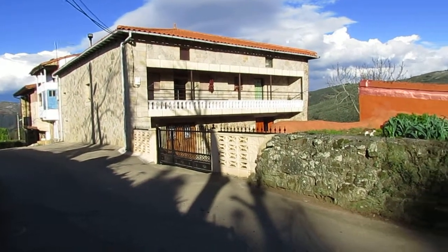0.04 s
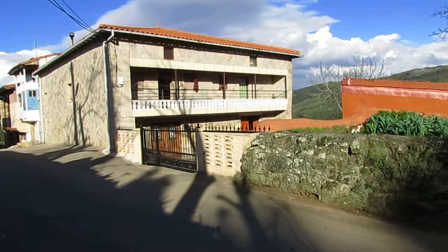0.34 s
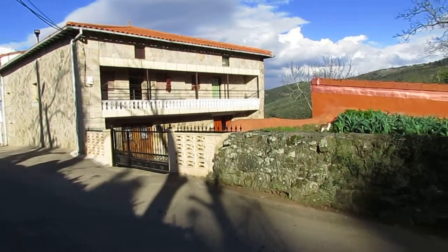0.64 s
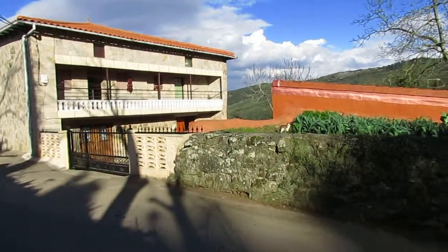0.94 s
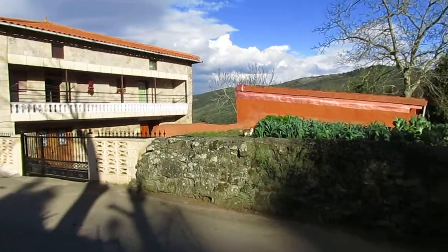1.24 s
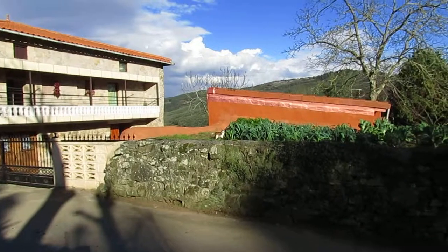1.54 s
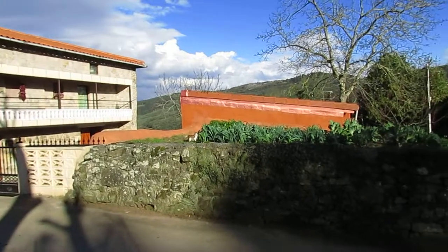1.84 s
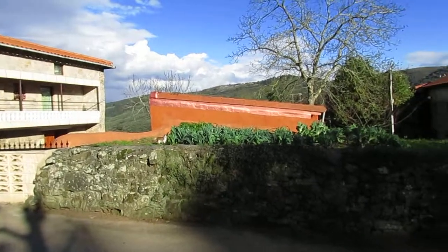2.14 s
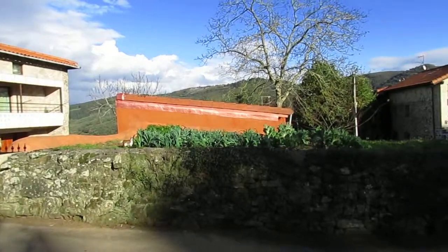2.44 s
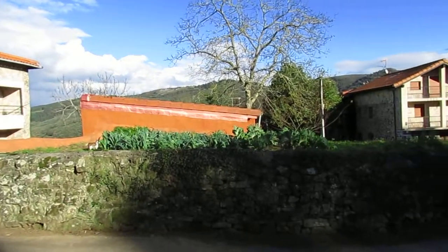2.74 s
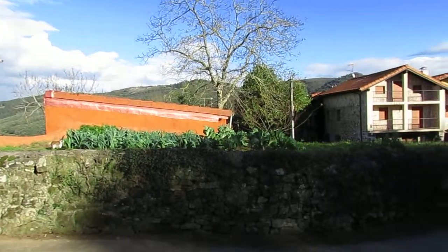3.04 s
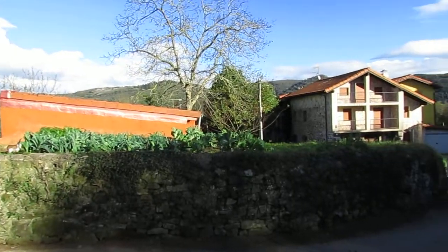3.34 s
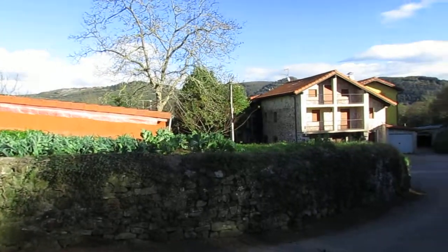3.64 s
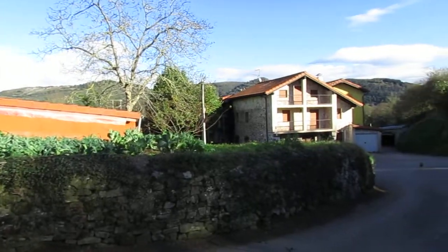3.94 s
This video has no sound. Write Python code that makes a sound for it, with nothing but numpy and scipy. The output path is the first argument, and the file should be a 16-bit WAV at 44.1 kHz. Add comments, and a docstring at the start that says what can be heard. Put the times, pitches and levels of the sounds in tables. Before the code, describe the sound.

Sharp hollow knocks repeat steadily and grow louder in a village street, with wind rumble.

```python
"""A village street with stone walls, where hard, hollow knocks come about twice a second and grow louder.
Each knock is a quick run of contacts that ring a hollow body, inside a short puff of hiss.
The houses throw the sound back. Gusts buffet the microphone, a small bird ticks four times,
and a wash of faraway outdoor noise slowly rises."""
import sys
import numpy as np
from scipy import signal
from scipy.fft import rfft, irfft
from scipy.io import wavfile

SR = 44100
rng = np.random.default_rng(int(sys.argv[2]) if len(sys.argv) > 2 else 0)


def unload_audio(sound):
    """Save the sound as a 16-bit wav file, at the path given as the first command line argument."""
    columns = np.transpose(np.atleast_2d(sound))
    # keep every value between -1 and 1, then stretch to whole-number steps
    steps = np.round(np.clip(columns, -1, 1) * 32767)
    wavfile.write(sys.argv[1], SR, steps.astype(np.int16))


N = 176400

# the knocks: t/s, body level/dB, hiss level/dB, stretch factor for the contact delays
KNOCKS = [(0.183, -36.5, -62, 1.0), (0.649, -33, -61.5, 1.0), (1.120, -38.5, -62.5, 1.16),
          (1.59, -33, -56, 1.17), (2.061, -30, -55, 1.01), (2.525, -27, -54, 1.005),
          (2.990, -27, -50.5, 1.0), (3.461, -23, -48.5, 1.1), (3.928, -24.5, -48.5, 1)]
# the contacts within one knock: delay/s, level/dB, favoured f/Hz, reach around it/octaves
CONTACTS = [(0.0, 1, 1620, 0.61), (.0032, -1.5, 1750, .35), (.0058, -7, 1540, 1.3), (.009, 2.5, 1350, 0.66),
            (0.0122, -1, 920, .3), (0.0186, -3.5, 1220, .6)]


def amp(db):
    """Turns decibels into a gain to multiply by."""
    return 10 ** (np.asarray(db) / 20)


def unit(x):
    """Scales a signal to an average strength (rms) of 1."""
    return x / np.sqrt(np.mean(x ** 2) + 1e-20)


def read(points, hz):
    """Looks up values between a table's rows, on a log-frequency scale."""
    f, value = np.transpose(points)
    return np.interp(np.log(hz + 1), np.log(f + 1), value)


def curve(table, column):
    """Turns one dB column of a time table into a gain for every sample."""
    rows = np.array(table)
    return amp(np.interp(np.arange(N) / SR, rows[:, 0], rows[:, column]))


def add(mix, start, sound):
    """Mixes a sound in at a start time in seconds."""
    part = mix[max(round(start * SR), 0):][:len(sound)]
    part += sound[:len(part)]


def noise(colour, peaks=()):
    """Steady noise with a colour (its level at each frequency) and optional resonances."""
    hz = np.fft.rfftfreq(N, 1 / SR)
    peaks_db = sum(lift * np.exp(-((hz - centre) / width) ** 2) for centre, width, lift in peaks)
    return unit(irfft(rfft(rng.standard_normal(N)) * amp(read(colour, hz) + peaks_db), N))


def wobble(hz):
    """Smooth random motion, up to about the given rate."""
    keep_slow = np.exp(-(np.fft.rfftfreq(N, 1 / SR) / hz) ** 2)
    return unit(irfft(rfft(rng.standard_normal(N)) * keep_slow, N))


def street_reverb(x):
    """Sound lingers between the houses; its tail slowly changes as the microphone turns."""
    # how long the street rings: f/Hz, time to fade by 60 dB/s
    fade_times = [(300, 0.68), (1000, 0.71), (2500, 0.89), (6000, 0.59), (13000, 0.12)]
    out, progress = np.zeros((2, N)), np.arange(N) / N
    for centre in np.linspace(0, 1, num=5):  # five tails, each blending into the next
        hz, t, spectrum = signal.stft(rng.standard_normal((2, SR)), SR, nperseg=256)
        fade = amp(-60 * t / read(fade_times, hz)[:, None])
        tail = signal.istft(spectrum * fade * (1 - np.exp(-t / 0.0046)), SR)[1]
        share = np.cos(np.pi / 2 * np.minimum(abs(progress - centre) * 4, 1))
        out += signal.fftconvolve((x * share)[None], tail / np.linalg.norm(tail[0]), axes=1)[:, :N]
    return out * amp([[0], [-3.5]])  # softer on the right


def in_street(x, right_db, reverb_db):
    """A sound reaches the left ear first, followed by wall echoes and the street's reverb."""
    # echoes off the walls: delay/s, left level/dB, right level/dB
    wall_echoes = [(0.019, -17.5, -27), (.036, -12.5, -21), (.049, -16.5, -26), (.08, -23.5, -24.5),
                   (.105, -27, -28)]
    right_lag_s = .000032
    out = np.array([x, amp(right_db) * x])
    for delay, *sides_db in wall_echoes:
        for side, db in zip(out, sides_db):
            add(side, delay, amp(db) * x)
    out[1] = irfft(rfft(out[1]) * np.exp(-2j * np.pi * np.fft.rfftfreq(N, 1 / SR) * right_lag_s), N)
    return out + amp(reverb_db) * street_reverb(x)


def outdoor_air():
    """A faraway wash with a few faint resonances, plus fine hiss, different at each ear."""
    # background loudness: t/s, wash level/dB, hiss level/dB
    levels = [(0, -58, -72), (.5, -68, -67.5), (1.2, -53.5, -69), (1.9, -55.5, -68), (2.5, -51, -63.5),
              (3.0, -50, -62), (3.35, -46, -61), (4, -43, -57)]
    # colours of the wash and the hiss: f/Hz, level/dB
    wash_colour = [(40, 18.5), (150, -1), (300, 8), (440, 1.5), (1050, 2.5), (1900, -10), (3000, -15.5),
                   (4500, -26), (9000, -41)]
    hiss_colour = [(500, -18.5), (2000, 6), (3200, 1), (5000, 1), (7200, -4.5), (9500, -8), (12500, -11.5),
                   (14500, -20)]
    # resonances in the wash: f/Hz, width/Hz, lift/dB
    wash_peaks = [(552, 66, 6.5), (874, 28, 4.5), (1550, 52, 3.5), (2730, 89, 6.5), (3160, 50, 11)]
    ears = []
    for _ in range(2):
        wash = curve(levels, column=1) * noise(wash_colour, wash_peaks) * amp(1.65 * wobble(hz=26))
        ears.append(wash + curve(levels, column=2) * noise(hiss_colour))
    return np.array(ears)


def bird_ticks():
    """A small bird's thin, slightly rough whistles sweep upward so fast that they sound like ticks."""
    # the ticks: t/s, level/dB
    ticks = [(1.01, -59.5), (1.209, -60), (1.26, -61), (1.407, -58.5)]
    length_s, low_hz, top_hz = 0.017, 4880, 7400
    out, progress = np.zeros(N), np.arange(0, length_s, 1 / SR) / length_s
    sweep_hz = low_hz + (top_hz - low_hz) * np.sin(1.9 * progress ** 0.78)
    for start, db in ticks:
        rough_hz = sweep_hz * (1 + .06 * wobble(hz=1180)[:len(progress)])
        whistle = np.sin(2 * np.pi * np.cumsum(rough_hz) / SR)
        add(out, start, amp(db) * np.sin(np.pi * progress) * whistle)
    return in_street(out, right_db=1.0, reverb_db=-4)


def wind_on_microphone():
    """Gusts rumble, flutter and pop, pushing the two channels opposite ways; hard gusts also rasp."""
    # wind strength: t/s, rumble level/dB, flutter level/dB
    gusts = [(0.0, -17, -20), (.08, -19, -16.5), (.115, -24, -14), (.21, -22.5, -18.5), (.235, -23.5, -30),
             (.27, -21.5, -22), (.42, -20, -24.5), (.53, -16, -22.5), (.58, -15.5, -20), (.615, -22, -39),
             (.65, -17.5, -21), (.72, -23.5, -38), (.82, -39, -61), (.88, -21.5, -62), (.97, -29, -25.5),
             (1.0, -23.5, -37.5), (1.06, -23, -24), (1.17, -21.5, -30.5), (1.25, -22.5, -33.5),
             (1.3, -21, -23.5), (1.38, -24.5, -37), (1.62, -19.5, -37), (1.68, -51.5, -63),
             (1.88, -43, -72), (2.02, -50, -69), (2.09, -33.5, -51.5), (2.18, -42, -71), (2.235, -20, -27),
             (2.31, -28.5, -47), (2.37, -27, -40.5), (2.44, -47, -66), (2.51, -16.5, -39),
             (2.57, -29.5, -39), (2.62, -19, -31.5), (2.68, -21, -39), (2.72, -23.5, -52),
             (3.0, -43.5, -56), (3.22, -26, -64), (3.3, -39, -65), (3.54, -36, -64), (3.59, -21, -52),
             (3.71, -21.5, -55), (3.8, -33, -67)]
    # colours of the deep rumble, the flutter above it and the rasp: f/Hz, level/dB
    rumble_colour = [(10, -35), (25, 0), (50, 3), (110, 3.5), (165, -4), (240, -16.5), (1200, -86)]
    flutter_colour = [(60, -21.5), (150, -1), (230, -0.5), (330, -6), (480, -14), (700, -31), (1300, -67)]
    rasp_colour = [(100, -20), (300, -2), (730, -1), (880, -13.5), (1150, -18.5), (2100, -38), (3500, -72)]
    # small swirls of air that pop: t/s, strength (+ pushes, - sucks), width/s
    pops = [(0.088, -0.33, 0.00068), (0.097, 0.64, 0.00094), (.103, -0.82, 0.00045), (0.267, 0.69, .0012),
            (.277, -0.67, 0.001), (.484, -0.53, 0.00099), (.511, 0.73, 0.00092), (.532, 0.65, 0.0012),
            (.564, 0.94, 0.00072), (.961, -0.38, 0.0016), (.982, 0.69, 0.0017), (1.052, -0.55, 0.0014),
            (1.071, 0.72, 0.00077), (1.142, 0.55, 0.0012), (1.173, 0.58, 0.0014), (1.302, 0.4, .001),
            (1.316, -0.53, 0.0018), (1.469, 0.33, 0.0015), (2.627, -0.44, .0018), (2.853, -0.39, 0.0051),
            (3.59, -0.9, 0.0031), (3.72, 0.5, 0.0028)]
    # the side the wind favours as the microphone turns: t/s, left minus right/dB
    balance = [(0.15, 2), (.6, -1.68), (2.3, -2.1), (2.6, 3.5), (4, 1.5)]
    flap_hz = 21 * (1 + .4 * wobble(hz=12))
    flaps = unit(amp(3 * np.sin(2 * np.pi * np.cumsum(flap_hz) / SR)))
    rumble_gain = curve(gusts, column=1) * amp(-1) * flaps
    gust_gain = curve(gusts, column=2) * flaps * unit(amp(2.3 * wobble(hz=64)))
    # two separate noises: push moves the channels opposite ways, common moves them together
    push, common = (rumble_gain * noise(rumble_colour)
                    + amp(2) * gust_gain * noise(flutter_colour)
                    + amp(-1.5) * gust_gain ** 1.604 * noise(rasp_colour) for _ in range(2))
    for when, strength, width in pops:
        offset = (np.arange(N) / SR - when) / width
        wake = np.exp(-(offset / 4) ** 2)
        pulse = 1.25 / (1 + offset ** 2) ** 2 - .28 * wake
        push = push * (1 - .7 * wake) + strength * pulse  # the noise dips around each pop
    common = common * amp(-11) / 2
    lean = np.sqrt(curve(balance, column=1)) * np.exp(0.1 * wobble(hz=6.7))
    stereo = np.array([common + push * lean, common - np.roll(push, shift=4) / lean])
    rounded = stereo / (1 + stereo ** 4) ** (1 / 4)  # squashes the biggest peaks
    return signal.sosfiltfilt(signal.butter(4, 1900, fs=SR, output="sos"), rounded)


def hiss_puffs():
    """Gritty hiss swells just ahead of each knock, snaps at each contact and dies; a soft swell follows."""
    lead_s, rise_s, puff_fade_s, snap_fade_s = 0.014, 0.025, 0.11, 0.015  # fades are for a 60 dB drop
    level, t = np.zeros(N), np.arange(SR // 4) / SR
    puff_db = -8.5 * np.maximum(1 - t / rise_s, 0) - 60 * np.maximum(t - rise_s, 0) / puff_fade_s
    puff = amp(puff_db) * np.minimum(t / 0.004, 1)
    late_swell = np.exp(-((t - 0.099) / 0.023) ** 2)
    for start, _, db, stretch in KNOCKS:
        add(level, start - lead_s, amp(db + 10.5) * puff)
        add(level, start, amp(db - 1) * late_swell)
        for delay, contact_db, *_ in CONTACTS:
            snap = amp(db + contact_db - 4 - 60 * t / snap_fade_s)
            add(level, start + delay * stretch, snap)
    # colour of the puff: f/Hz, level/dB
    puff_colour = [(400, -2.5), (1000, 9), (2400, 5.5), (3500, 3), (5000, -1), (7200, -0.5), (9500, -6.5),
                   (12500, -7), (15000, -29.5)]
    gritty_hiss = noise(puff_colour) * amp(1.26 * wobble(hz=500))
    return in_street(level * gritty_hiss, right_db=-5, reverb_db=-6)


def hollow_knocks():
    """Several quick contacts ring one hollow body; the early ones sound higher than the late ones."""
    # the tones the body rings with: f/Hz, level/dB, time to fade by 60 dB/s
    body_tones = [(837, -3.5, 0.033), (964, -2, 0.036), (1121, -10.5, 0.062), (1362, -6, 0.049),
                  (1484, -5.5, 0.05), (1646, 0.5, 0.025), (1828, -10, 0.03), (2028, -11, 0.055),
                  (2350, -8, 0.046), (2534, -6.5, 0.016), (2958, -6, 0.027), (8640, -9, 0.14)]
    jitter_s, detune = .0006, 0.022
    out, t = np.zeros(N), np.arange(SR // 4) / SR
    hz, tone_db, fade_s = np.transpose(body_tones)
    attack = 1 - np.exp(-t / .0005)
    fades = amp(-60 * t / fade_s[:, None])
    for start, db, _, stretch in KNOCKS:
        for delay, contact_db, favoured_hz, reach in CONTACTS:
            # tones near the contact's favoured pitch are struck hardest
            drive = 0.029 + np.exp(-.5 * (np.log2(hz / favoured_hz) / reach) ** 2)
            pitch = hz * (1 + detune * rng.standard_normal(len(hz)) * (hz < 4410))  # top tone stays put
            phase = rng.uniform(0, 2 * np.pi, (len(hz), 1))
            tones = fades * np.sin(2 * np.pi * pitch[:, None] * t + phase)
            ring = (drive * amp(tone_db)) @ tones
            when = start + delay * stretch + jitter_s * rng.standard_normal()
            add(out, when, amp(db + contact_db - .5) * ring * attack)
    return in_street(out, right_db=-12, reverb_db=-14)


def scene():
    """Everything heard in the street, in stereo."""
    return hollow_knocks() + hiss_puffs() + wind_on_microphone() + bird_ticks() + outdoor_air()


def record(dry):
    """The ends fade briefly; the microphone weakens two narrow bands and cuts the highest treble."""
    # dips in the microphone's response: f/Hz, width/Hz, depth (0 to 1)
    dips = [(3943, 195, 0.66), (7950, 190, .9)]
    fade_s, cutoff_hz = .004, 14900
    hz = np.fft.rfftfreq(N, 1 / SR)
    response = np.prod([1 - depth * np.exp(-((hz - f) / width) ** 2) for f, width, depth in dips], axis=0)
    treble_cut = signal.firwin(511, cutoff_hz, window=("kaiser", 9), fs=SR)
    from_end_s = np.minimum(np.arange(N), np.arange(N)[::-1]) / SR
    soft_ends = np.sin(np.pi / 2 * np.minimum(from_end_s / fade_s, 1)) ** 2
    return signal.oaconvolve(irfft(rfft(dry * soft_ends) * response, N), treble_cut[None], "same")


dry = scene()
out = record(dry)
unload_audio(out)
```